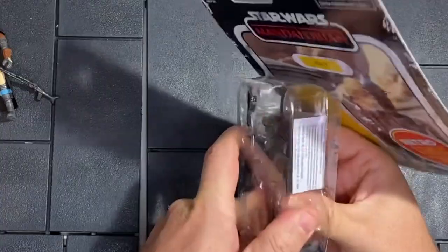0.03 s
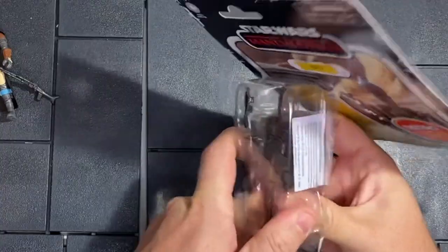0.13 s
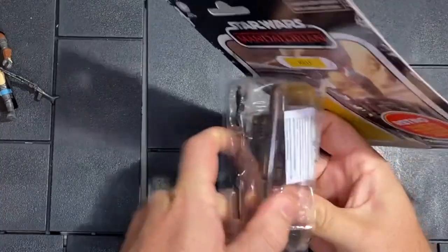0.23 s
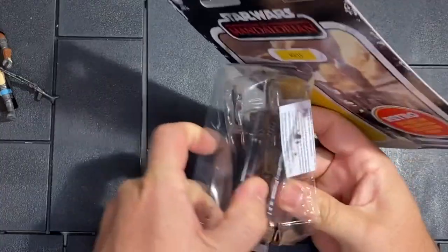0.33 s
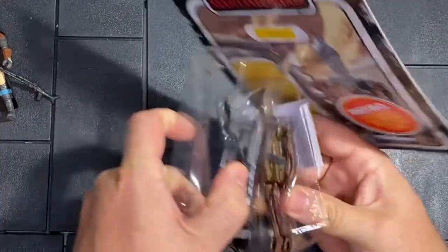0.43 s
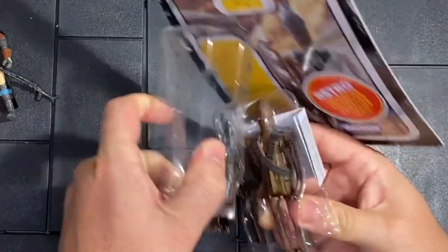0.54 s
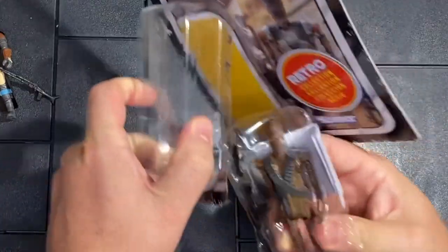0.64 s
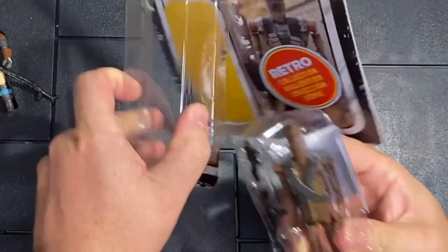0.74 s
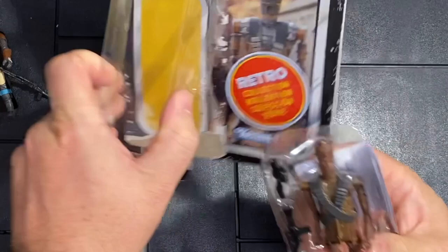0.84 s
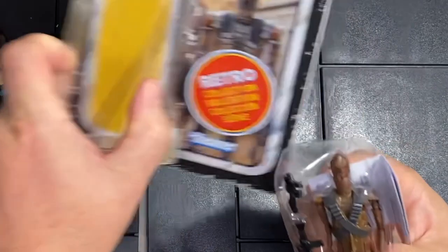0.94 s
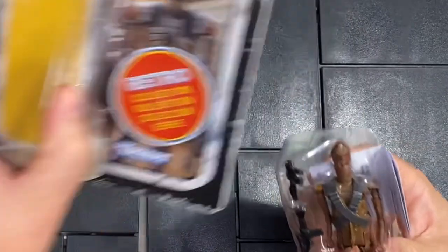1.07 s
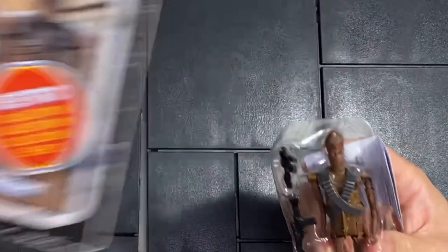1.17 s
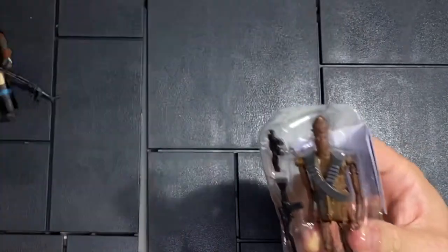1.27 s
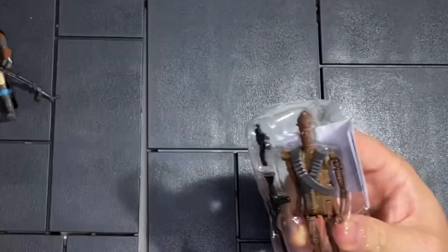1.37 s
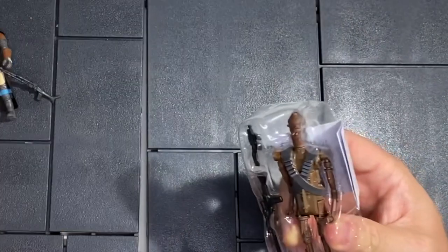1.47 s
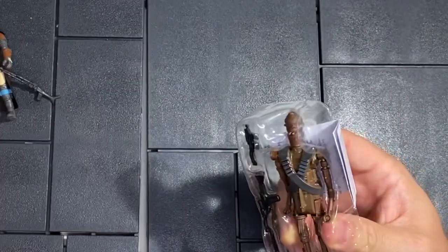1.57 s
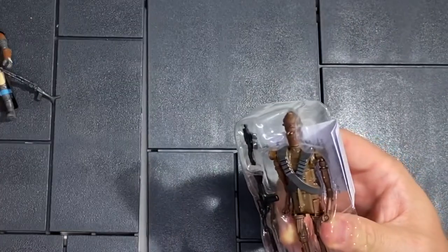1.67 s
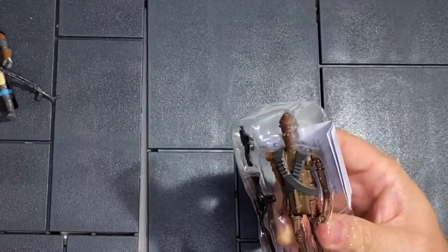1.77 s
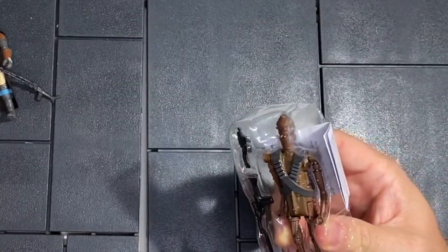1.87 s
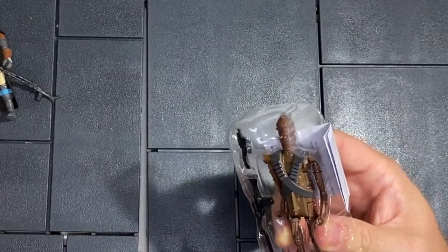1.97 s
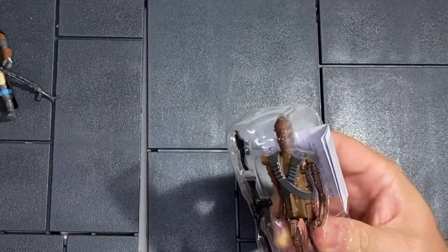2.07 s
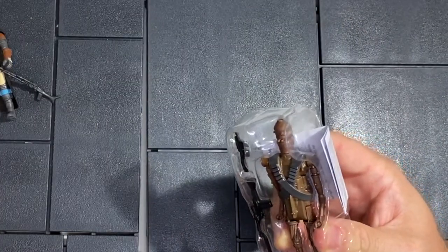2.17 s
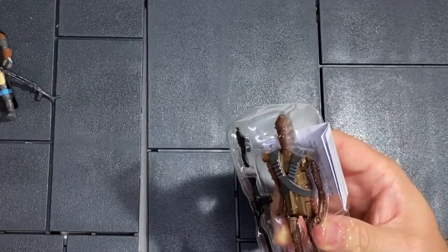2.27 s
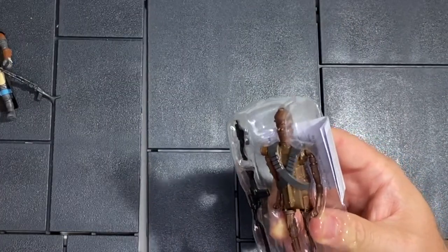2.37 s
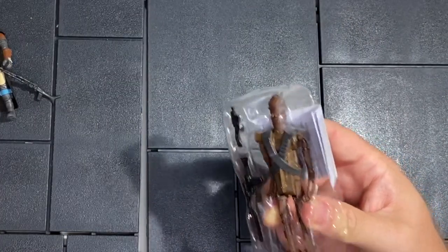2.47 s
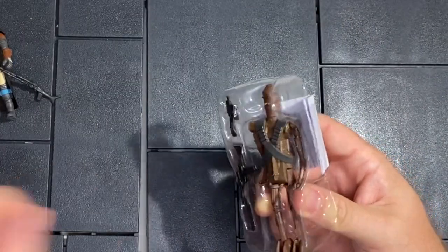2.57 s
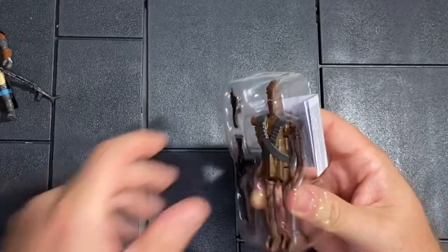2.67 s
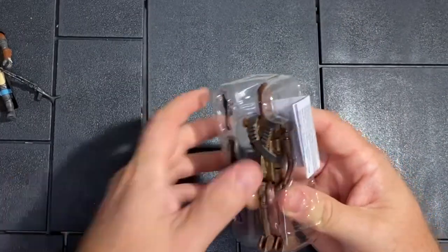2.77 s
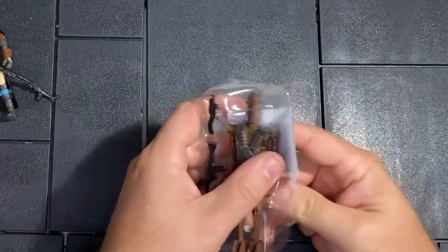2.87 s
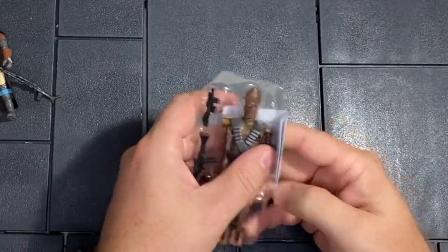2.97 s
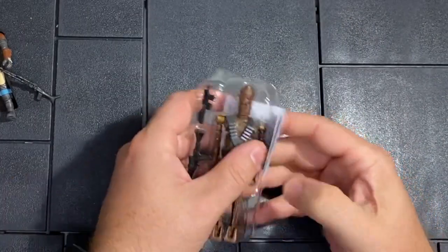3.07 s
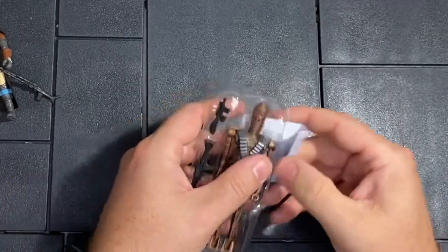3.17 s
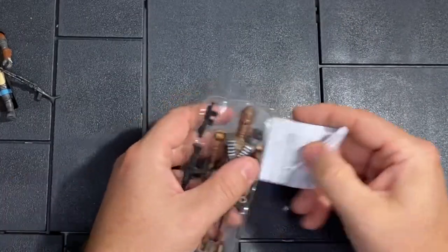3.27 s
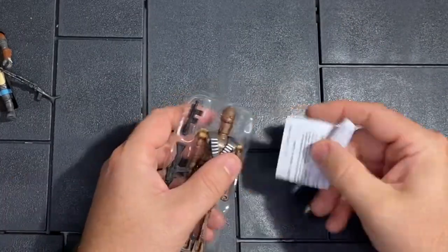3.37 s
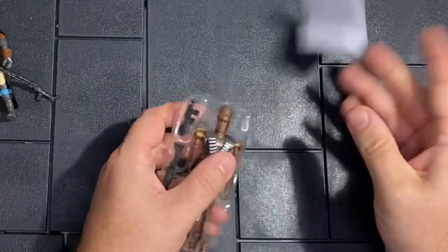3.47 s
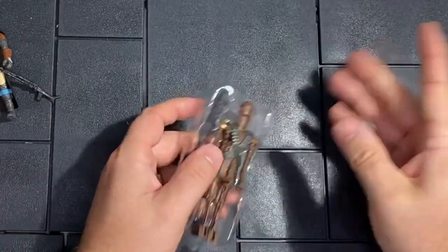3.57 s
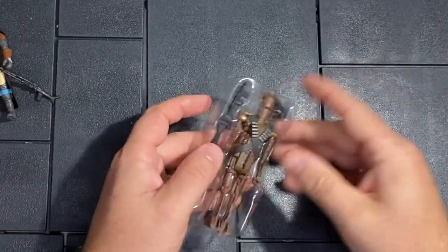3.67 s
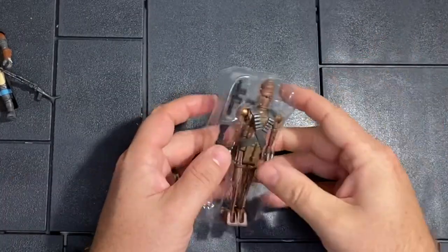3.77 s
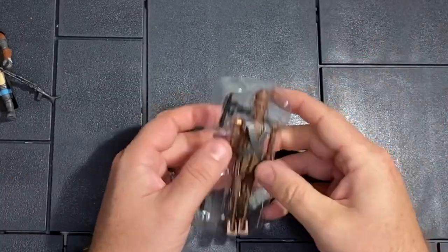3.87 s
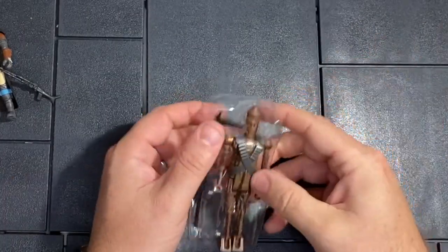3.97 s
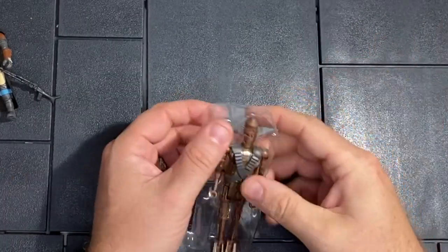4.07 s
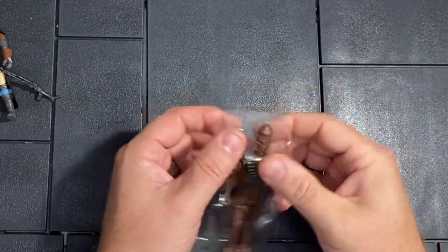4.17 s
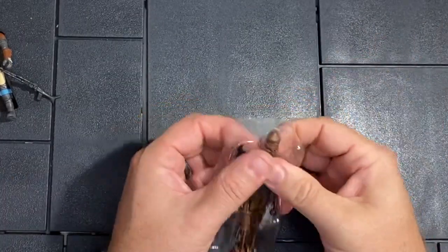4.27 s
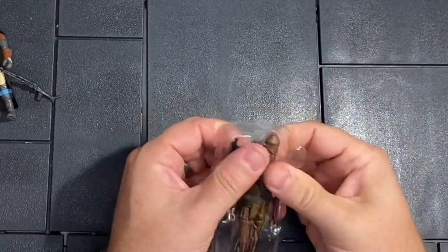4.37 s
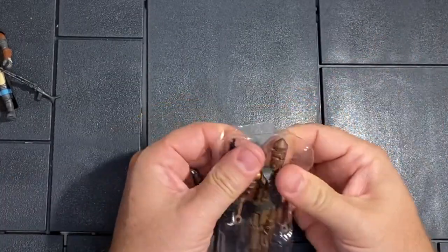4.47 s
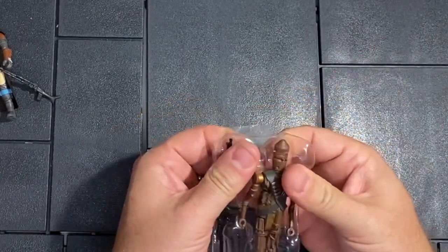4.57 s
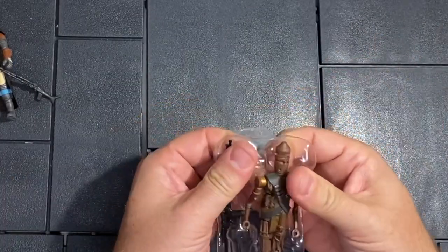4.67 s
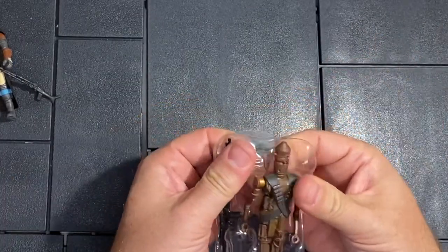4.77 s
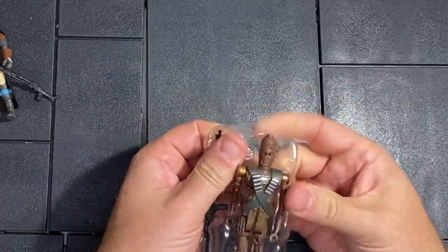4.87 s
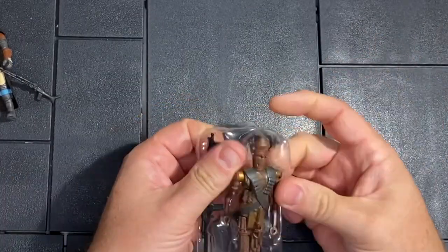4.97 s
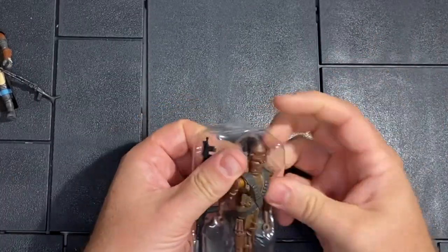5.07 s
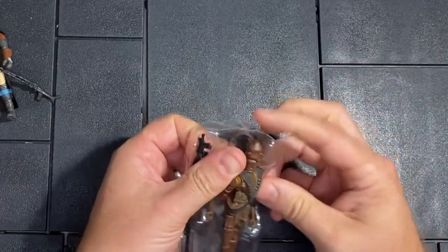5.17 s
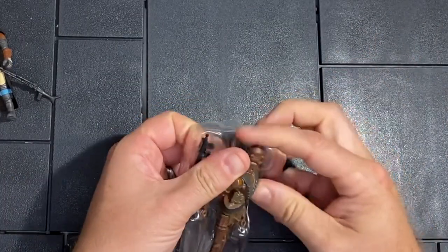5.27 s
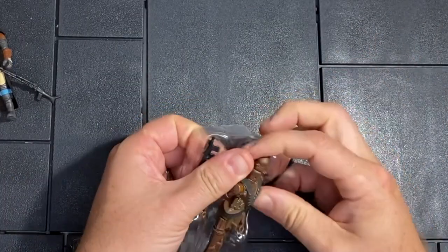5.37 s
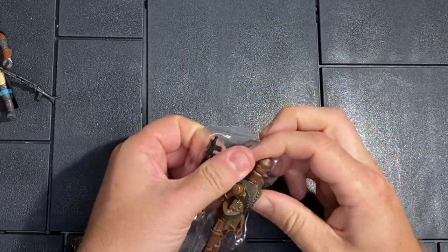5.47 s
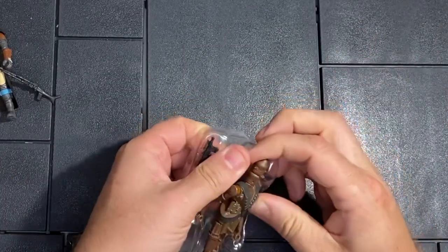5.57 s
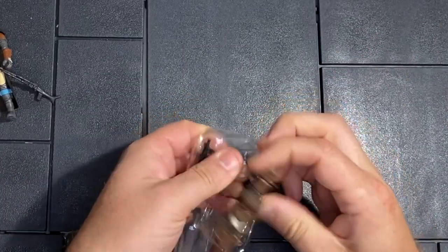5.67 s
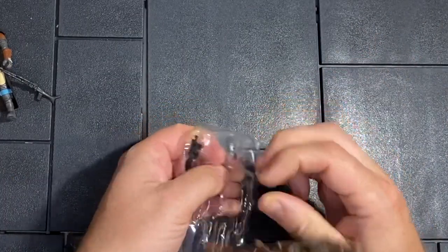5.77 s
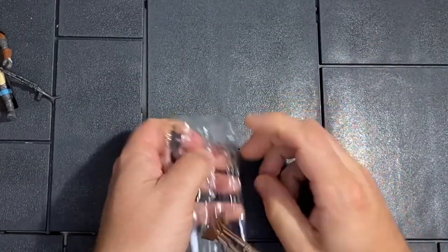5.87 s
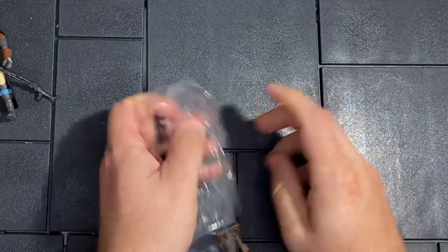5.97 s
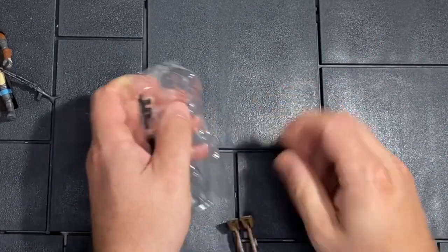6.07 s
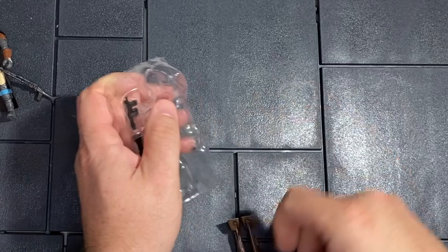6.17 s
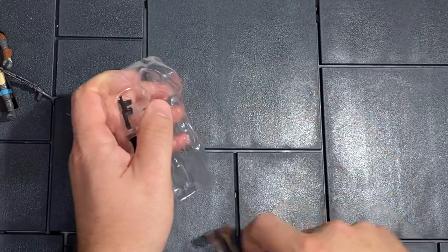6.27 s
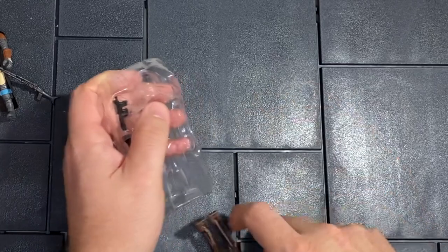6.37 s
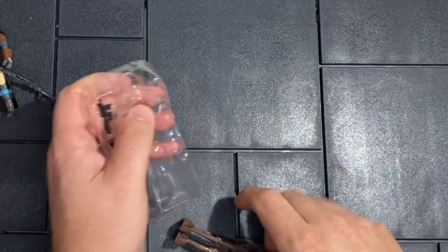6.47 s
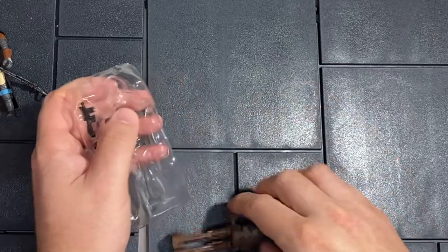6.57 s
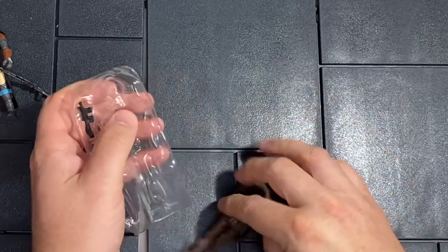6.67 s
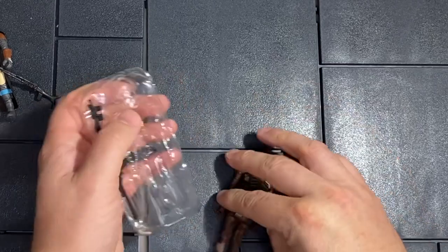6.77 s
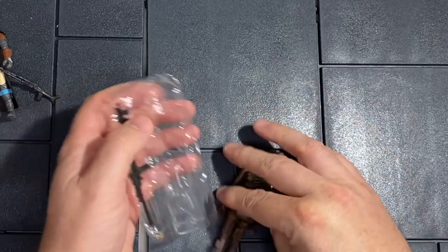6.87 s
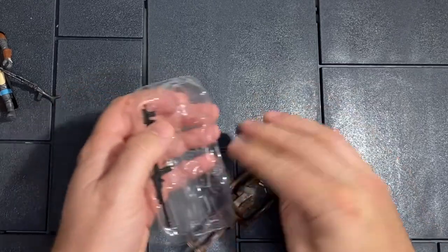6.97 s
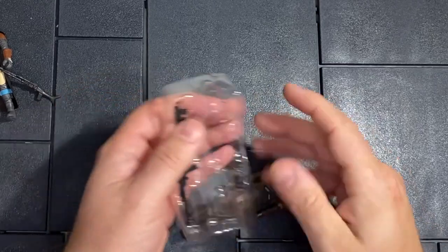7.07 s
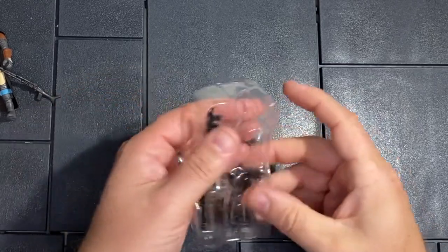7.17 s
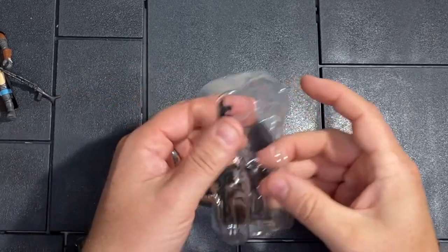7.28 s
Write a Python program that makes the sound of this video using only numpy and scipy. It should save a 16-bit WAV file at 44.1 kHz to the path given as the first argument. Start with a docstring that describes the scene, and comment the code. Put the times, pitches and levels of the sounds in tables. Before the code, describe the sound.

Close handling of a stiff plastic blister: sharp pops, creaky rubbing and crinkles, loudest just before a little plastic figure knocks down and scrapes briefly.

```python
"""Small, quiet room, heard close by: hands pull a clear plastic blister off its card, slide out a leaflet, free a figure.
Shell: panels flip as noise cracks plus sinking tones; stick-slip noise through resonances makes rubbing and creaks.
Card flaps: noise pushes dispersed by bending waves. Knocks: decaying table modes.
The figure drops on the table and is pushed along it as juddering noise; hands bump dully.
Random echoes and a noise tail form the room, over faint steady noise."""
import sys
import numpy as np
from scipy import signal
from scipy.fft import rfft, irfft
from scipy.io import wavfile
from scipy.ndimage import map_coordinates

SR = 44100
rng = np.random.default_rng(int(sys.argv[2]) if len(sys.argv) > 2 else 0)


def transcribe(u):
    """Save the signal u as a 16-bit wav file named by the first command-line argument.

    u: samples, shape (n,) or (channels, n), limited to [-1, 1]; the rate is SR.
    q: integer samples, one column per channel.
    """
    v = np.clip(np.atleast_2d(u).T, -1, 1)
    q = np.round(v * 32767).astype(np.int16)
    wavfile.write(sys.argv[1], SR, q)


N = 322635
T = np.arange(N) / SR


def undb(db):
    """Decibels to gain."""
    return 10 ** (np.asarray(db) / 20)


def unit(x):
    """Scale to rms 1."""
    return x / np.sqrt(np.mean(x ** 2))


def unit_energy(x):
    """Scale to mean energy 1 per channel."""
    return unit(x) / np.sqrt(x.shape[-1])


def fade(t, t60):
    """Exponential decay, -60 dB at t60."""
    return np.exp(-np.log(1000) * t / t60)


def curve(table, axis=1):
    """One table column interpolated at every sample."""
    rows = np.array(table)
    return np.interp(T, rows[:, 0], rows[:, axis])


def add(out, s, x):
    """Mix x in at time s."""
    i = max(int(s * SR), 0)
    out[:, i:i + x.shape[-1]] += x[..., :N - i]


def convolve(x, response):
    """Filter by an impulse response, keeping the length."""
    return signal.fftconvolve(np.atleast_2d(x), np.atleast_2d(response), axes=-1)[:, :x.shape[-1]]


def colour(x, points, size=4096):
    """Minimum-phase filter through (f/Hz, level/dB) points."""
    hz, db = np.transpose(points)
    grid_hz = np.maximum(np.arange(size // 2 + 1) * SR / size, 1)
    gain_db = np.interp(np.log(grid_hz), np.log(hz), db)
    cepstrum = irfft(np.log(undb(gain_db)))
    # fold to the causal half
    cepstrum[1:size // 2] *= 2
    cepstrum[size // 2 + 1:] = 0
    return convolve(x, irfft(np.exp(rfft(cepstrum))))


def highpass(x, hz, order=2):
    """Butterworth cut below hz."""
    return signal.sosfilt(signal.butter(order, hz, "high", fs=SR, output="sos"), x)


def resonate(x, hz, width_hz):
    """One resonance with a moving centre: shift to 0 Hz, smooth, shift back."""
    turn = np.exp(2j * np.pi * np.cumsum(hz) / SR)
    pole = np.exp(-np.pi * width_hz / SR)
    return np.real(turn * signal.lfilter([1 - pole], [1, -pole], x / turn))


def noise(size, apart):
    """Two-port noise; apart is the power share not in common."""
    share = np.clip(apart, 0, 1)
    z = rng.standard_normal((3, size))
    return np.sqrt(1 - share) * z[0] + np.sqrt(share) * z[1:]


def wander(per_second):
    """Slow random curve, knots of spread 1."""
    knots = rng.standard_normal(512)
    return np.interp(T * per_second, np.arange(len(knots)), knots)


def strokes(table, crest, catch_db, ebb_db, axis=2):
    """Gain of gestures: each catches quickly, moves to its crest level at a share of its length, ebbs, lets go."""
    gain = np.zeros(N)
    for row in table:
        start, length = row[:2]
        crest_s = .002 + np.clip(crest, .05, .95) * length
        corners = start + np.array([-.012, .002, crest_s, .002 + length, .052 + length])
        span = slice(max(int(corners[0] * SR), 0), int(corners[-1] * SR))
        shape_db = np.interp(T[span], corners, [-30, catch_db, 0, ebb_db, -40])
        gain[span] = np.maximum(gain[span], undb(row[axis] + shape_db))
    return gain


def slips(per_second, spread_db, grain_t60, smooth_db):
    """Stick-slip: tiny noise bursts of very uneven size over a smooth hiss."""
    hits = rng.random(N) < per_second / SR
    sizes = undb(spread_db * np.minimum(rng.exponential(size=N), 4))
    power = convolve(hits * sizes ** 2, fade(T[:SR // 10], grain_t60) ** 2)
    envelope = np.sqrt(np.abs(power / power.mean()) + undb(smooth_db) ** 2)
    return noise(N, apart=0.51) * envelope


# resonances of the moulded shell: f/Hz, width/Hz, relative level/dB
SHELL_MODES = [(1710, 80, -5.5), (2290, 51, -11), (2910, 100, 0.5), (4900, 560, -6.5), (7080, 760, 0)]


def shell(x, ring_db):
    """The shell adds its fixed resonances to whatever shakes it."""
    rings = 0
    for hz, width_hz, db in SHELL_MODES:
        rings = rings + undb(db) * signal.lfilter(*signal.iirpeak(hz, hz / width_hz, fs=SR), x)
    return x + undb(ring_db) * rings


def gripped(x, ring_db, grip_db):
    """Shifting fingers broaden the shell resonances and vary the level of each at random."""
    rings = 0
    for hz, width_hz, db in SHELL_MODES:
        ring = signal.lfilter(*signal.iirpeak(hz, hz / (width_hz + 150), fs=SR), x)
        rings = rings + ring * undb(db + grip_db * wander(15))
    return x + undb(ring_db) * rings


CREEP_S = .004
SNAP_ENERGY_DB = 15
PANEL_SAG, PANEL_SAG_S = .12, .004  # initial sharpness as a share; time constant of its relaxation
# crack spectrum before tilt and shell: f/Hz, level/dB
CRACK_SPECTRUM = [(60, -47), (400, -0.5), (900, 4.5), (2000, 3), (3200, -3.5), (7000, -10), (9000, -14.5),
                  (11500, -9), (13600, -23.5), (15500, -19)]


def snap(pitch_hz, treble_db, size=4096):
    """A crease creeps, then the panel flips: a crack, sinking tones, a shiver through the sheet."""
    t = np.arange(size) / SR - CREEP_S
    after = np.maximum(t, 0)
    creep = undb(-10.0) * (t < 0) * fade(np.abs(t), 0.002)
    crack = noise(size, apart=0.17) * (creep + fade(after, .012) - fade(after, .0025))
    shiver = undb(-13.5) * noise(size, apart=.4) * fade(after, .065) * (t > 0)
    crack = highpass(crack + shiver, pitch_hz / 8)
    # a small, high-pitched panel moves little air below its own pitch
    tilt = [(pitch_hz / 4, -5), (pitch_hz * .6, 0), (4500, 0), (7000, 1.1 * (treble_db + 20.0))]
    coloured = colour(colour(crack, CRACK_SPECTRUM), sorted(tilt))
    crack = unit_energy(shell(coloured, ring_db=-2.5))
    sag_s = PANEL_SAG * PANEL_SAG_S * (1 - np.exp(-after / PANEL_SAG_S))
    cycles = pitch_hz * (after + sag_s) / (1 + PANEL_SAG / 2)
    # a curved panel has a second, weaker mode above the first
    modes = np.sin(2 * np.pi * cycles) + .5 * np.sin(2 * np.pi * cycles * rng.uniform(1.1, 1.55))
    panel = highpass(modes * (fade(cycles, 36) - fade(cycles, 3.5)), pitch_hz / 2)
    return undb(SNAP_ENERGY_DB) * unit_energy(crack + unit_energy(panel))


# shell buckles and, after the drop, figure clacks:
# t/s, level/dB before SNAP_ENERGY_DB, panel f/Hz, treble setting (-20 is neutral, higher is brighter)
SNAP_EVENTS = [(0.097, -24.5, 1500, -18), (0.184, -16, 985, -16.5), (0.213, -18.5, 798, -28),
               (0.248, -6.5, 1070, -11), (0.28, -5, 1673, -19.5), (0.456, -15.5, 1463, -19),
               (0.621, -26.5, 2940, -19), (0.669, -25.5, 719, -16.5), (0.723, -25.5, 1360, -50),
               (0.808, -34.5, 1400, -15), (0.968, -34.5, 6900, -9), (1.009, -28.5, 3040, -19),
               (1.77, -18, 1186, -27), (1.807, -12, 1044, -28), (2.546, -40, 1624, -36),
               (2.687, -48, 1820, -32), (2.987, -10.5, 1024, -19.5), (3.008, -19, 1020, -17),
               (3.028, -18.5, 2200, -34), (3.221, -25, 1520, -32), (3.576, -28.5, 1560, -9),
               (3.854, -26, 1030, -18), (3.934, -25, 1078, -21.5), (4.101, -28.5, 996, -22),
               (4.211, -33, 1110, -28), (4.239, -28.5, 1041, -31), (4.319, -10.5, 2500, -14),
               (4.33, -13.5, 2300, -40), (4.42, -22.5, 1000, -15), (4.471, -11.5, 2230, -13.5),
               (4.517, -1, 1774, -18), (4.5272, -1, 1865, -30), (4.553, -0.5, 6940, -6),
               (4.598, -10, 1835, -15), (4.737, -13.5, 1710, -19.5), (4.853, -13, 4740, -20),
               (4.871, -15, 3000, -14), (4.894, -18.5, 1900, -18), (4.919, -15, 1654, -15.5),
               (5.008, -16.5, 730, -15), (5.026, -17, 7050, -14), (5.034, -15.5, 2100, -9),
               (5.073, -3, 1674, -20.5), (5.114, -16, 2370, -26), (5.133, -17.5, 1155, -29),
               (5.225, -16.5, 1436, -30), (5.269, -35, 14700, -3), (5.344, -13, 915, -26),
               (5.368, -16, 960, -39), (5.541, -13.5, 1042, -34.5), (5.624, -20, 1050, -23),
               (5.68, 4, 985, -22), (5.715, 5, 1117, -22), (5.759, -12, 1070, -33),
               (5.889, -13, 935, -12.5), (5.932, -19.5, 1000, -21), (5.952, -13.5, 1060, -29),
               (5.972, 1.5, 669, -26.5), (5.994, -3.5, 2140, -25), (6.081, -21.5, 1386, -28),
               (6.303, -26, 1820, -23), (6.526, -22, 1600, -32), (6.731, -26.5, 1306, -50)]


def snaps():
    """Panels flip at the listed times; the creep leads each flip."""
    out = np.zeros((2, N))
    for s, db, pitch_hz, treble_db in SNAP_EVENTS:
        add(out, s - CREEP_S, undb(db) * snap(pitch_hz, treble_db))
    return out


DROP_S = 5.92  # figure leaves the shell


def gripped_snaps():
    """Snaps before the drop, while the fingers still strain the shell."""
    return [row for row in SNAP_EVENTS if row[0] < DROP_S]


FOLLOW_MIN_S, FOLLOW_MAX_S, FOLLOW_DB, FOLLOW_OCTAVES = .007, 0.04, -15.5, .4


def followers():
    """Each gripped flip unloads the next panel, which flips soon after, weaker and at a nearby pitch."""
    out, rows = np.zeros((2, N)), gripped_snaps()
    chance = rng.random((len(rows), 2))
    for (s, db, pitch_hz, treble_db), (late, high) in zip(rows, chance):
        sound = snap(pitch_hz * 2 ** (FOLLOW_OCTAVES * (2 * high - 1)), treble_db)
        delay_s = FOLLOW_MIN_S + late * (FOLLOW_MAX_S - FOLLOW_MIN_S)
        add(out, s + delay_s, undb(db + FOLLOW_DB) * sound)
    return out


CREASES_PER_S, CREASE_DB, CREASE_SPREAD_DB = 10, 7.5, 3  # level over the friction gain
CREASE_HZ, CREASE_OCTAVES, CREASE_TREBLE_DB, CREASE_TREBLE_SPREAD_DB = 1652, 0.48, -20.5, 11.5


def small_snaps(friction):
    """Lesser creases flip at random, following the hands' friction, with random pitch and brightness."""
    out, count = np.zeros((2, N)), int(CREASES_PER_S * T[-1])
    times = rng.random(256)[:count] * T[-1]
    chance = np.clip(rng.standard_normal((256, 3)), -2, 2)
    for s, (strong, high, bright) in zip(times, chance):
        pitch_hz = CREASE_HZ * 2 ** (CREASE_OCTAVES * high)
        sound = snap(pitch_hz, CREASE_TREBLE_DB + CREASE_TREBLE_SPREAD_DB * bright)
        gain = friction[int(s * SR)] * undb(CREASE_DB + CREASE_SPREAD_DB * strong)
        add(out, s, gain * sound)
    return out


def pull(table):
    """Gain of a sustained pull; dies quickly outside its span."""
    outside_s = np.abs(T - np.clip(T, table[0][0], table[-1][0]))
    return undb(curve(table)) * fade(outside_s, 0.051)


HOLD_DB, HOLD_HISS_DB = -78, -91.5  # shell merely held
LEAFLET_HISS_DB, PRISE_HISS_DB = -5, -18.5  # relative to the pull
# fingers shift and slide on plastic: start t/s, length/s, creak drive level/dB, hiss drive level/dB
FINGER_SLIDES = [(0, 0.15, -40.5, -55), (.1, 0.37, -32, -51.5), (.36, 0.15, -33, -41.5),
                 (.68, 0.58, -51.5, -61), (1.125, 0.061, -46, -60), (1.29, 0.075, -49, -66.5),
                 (1.605, 0.23, -53, -64), (1.82, 0.28, -46, -91), (2.205, .03, -55.5, -73.5),
                 (2.58, 0.55, -70, -90), (2.765, 0.16, -51.5, -61), (2.875, 0.19, -38, -46),
                 (3.42, 0.11, -45, -52.5), (3.547, 0.18, -39, -48), (3.768, 0.61, -44, -57.5),
                 (4.21, 0.17, -41.5, -52), (5.615, 0.24, -27.5, -57), (6.283, 0.15, -38.5, -59),
                 (6.455, 0.34, -40.5, -57), (6.86, 0.29, -59.5, -81.5), (6.96, 0.38, -52, -72),
                 (7.18, 0.11, -39, -54)]
# leaflet slides out: t/s, friction drive level/dB
LEAFLET_PULL = [(3.04, -37), (3.088, -52.5), (3.238, -43.5), (3.27, -34.5), (3.325, -30.5), (3.41, -57.5)]
# figure is prised loose: t/s, friction drive level/dB
PRISE_PULL = [(4.36, -49), (4.472, -28), (4.686, -40.5), (4.854, -32), (4.96, -37), (5.032, -35),
              (5.112, -30.5), (5.374, -47), (5.52, -47.5)]


def effort():
    """Hand friction as creak and hiss gains: powers of holding, slides and two pulls add."""
    slides = np.array([strokes(FINGER_SLIDES, crest=0.24, catch_db=-1, ebb_db=-14.0, axis=k) for k in (2, 3)])
    power = slides ** 2 + undb([[HOLD_DB], [HOLD_HISS_DB]]) ** 2
    for table, hiss_db in (LEAFLET_PULL, LEAFLET_HISS_DB), (PRISE_PULL, PRISE_HISS_DB):
        power = power + (pull(table) * undb([[0], [hiss_db]])) ** 2
    return np.sqrt(power)


STRONG_DB, FORERUN_S, FORERUN_DB = -13.2, 0.016, -5.5  # slip ahead of snaps above STRONG_DB
SETTLE_DB, SETTLE_T60_S, SETTLE_HISS_DB, SETTLE_TREBLE_SHARE = -21.5, 0.18, -8, 0.23


def settling():
    """Friction gains around gripped snaps: a slip before strong ones, a dying slip after all; bright ones hiss more."""
    power, t = np.zeros((2, N)), T[:SR // 2] - FORERUN_S
    for s, db, _, treble_db in gripped_snaps():
        shape = np.where(t < 0, undb(FORERUN_DB) * (db > STRONG_DB), fade(t, SETTLE_T60_S))
        creak_db = db + SETTLE_DB
        hiss_db = creak_db + SETTLE_HISS_DB + SETTLE_TREBLE_SHARE * treble_db
        add(power, s - FORERUN_S, np.outer(undb([creak_db, hiss_db]), shape) ** 2)
    return np.sqrt(power)


def crinkles(per_second, pitch_hz, octaves, cycles, spread_db, size=512):
    """Many tiny creases flip as short decaying sines of random pitch, level and side."""
    out, t = np.zeros((2, N)), T[:size]
    chance = rng.random((int(per_second * T[-1]), 4))
    for when, high, strong, side in chance:
        hz = min(pitch_hz * 2 ** (octaves * np.log(high / (1 - high))), SR / 4)
        gain = undb(spread_db * min(-np.log(strong), 3))
        grain = np.sin(2 * np.pi * hz * t) * fade(t, cycles / hz) * gain
        add(out, when * T[-1], np.outer([.5 + side, 1.5 - side], grain))
    return unit(out)


CATCH_DB, CATCHES_PER_S = 2.5, 45  # sliding fingers catch and let go
# power share of crinkling in the friction: t/s, share/0-1
SQUEEZE_SHARE = [(0, 0.7), (1.4, 0.1), (3.4, 0.15), (4.4, 0.41), (5.9, 0.6), (6.4, 0.4)]
# friction that shakes the shell: f/Hz, level/dB
RUB_SPECTRUM = [(100, -31), (400, -8.5), (700, -5), (1050, 5.5), (1600, -4), (3500, -5.5), (5000, -11),
                (9000, -27)]
# hiss at the contact: f/Hz, level/dB
HISS_SPECTRUM = [(2000, -4.5), (4000, 2.5), (7300, 1.5), (8700, -8), (11500, -0.5), (13500, -32),
                 (15500, -12.5)]


def rubbing(creak_gain, hiss_gain):
    """Friction shakes the shell and hisses at the contact; pressure adds crinkles and fine ticks."""
    friction = slips(per_second=300, spread_db=9.0, grain_t60=0.0018, smooth_db=6.0)
    squeeze = np.clip(curve(SQUEEZE_SHARE), 0, 1)
    slide, buckle = np.sqrt(1 - squeeze), np.sqrt(squeeze)
    creases = crinkles(per_second=170, pitch_hz=1833, octaves=.4, cycles=21, spread_db=-1.0)
    shaking = slide * unit(colour(friction, RUB_SPECTRUM)) + buckle * highpass(creases, 360)
    ringing = gripped(shaking, ring_db=-5.0, grip_db=10.0)
    creak = unit(ringing * undb(CATCH_DB * wander(CATCHES_PER_S)))
    ticks = crinkles(per_second=17, pitch_hz=8300, octaves=0.12, cycles=3.6, spread_db=0.5)
    hiss = slide * unit(colour(friction, HISS_SPECTRUM)) + buckle * highpass(ticks, 4000)
    return creak * creak_gain * undb(-3.5) + hiss * hiss_gain * undb(-1.5)


CREAK_WIDTH_HZ, CREAK_STEP_HZ, CREAK_UPPER_DB = 340, 1150, -3.5  # step: upper resonance above the lower
# finger or leaflet drags over a bending panel: start t/s, length/s, level/dB, first f/Hz, last f/Hz
CREAK_EVENTS = [(2.604, 0.45, -62, 1700, 1760), (3.032, 0.035, -38.5, 2240, 2330),
                (3.038, 0.27, -44.5, 990, 1200), (3.253, 0.05, -32.5, 2240, 2800),
                (3.248, 0.052, -33.5, 980, 1250), (3.764, 0.082, -48, 1320, 1240),
                (3.94, 0.08, -49, 2560, 2310), (4.059, 0.083, -45, 1260, 1050),
                (4.747, 0.19, -41.5, 1800, 1920), (7.046, 0.083, -55, 2570, 1940)]


def creaks():
    """Stick-slip drives two resonances of a bending panel; they glide together."""
    friction = slips(per_second=300, spread_db=3.5, grain_t60=.004, smooth_db=-6)
    out = np.zeros((2, N))
    for row in CREAK_EVENTS:
        s, length, _, first_hz, last_hz = row
        gain = strokes([row], crest=.5, catch_db=-1.5, ebb_db=-4.5)
        span = gain > 0
        glide_hz = np.interp(T[span], [s, s + length], [first_hz, last_hz])
        tones = []
        for hz in (glide_hz, glide_hz + CREAK_STEP_HZ):
            once = resonate(friction[:, span], hz, CREAK_WIDTH_HZ)
            tones.append(unit(resonate(once, hz, CREAK_WIDTH_HZ)))
        low, high = tones
        out[:, span] += unit(low + undb(CREAK_UPPER_DB) * high) * gain[span]
    return out


FLAP_ENERGY_DB = 21.0
# card, paper and loosened shell flap and land: t/s, level/dB before FLAP_ENERGY_DB, f/Hz before limits
FLAP_EVENTS = [(0.044, -32, 431), (0.135, -33, 590), (0.208, -17, 710), (0.298, -19, 610),
               (0.456, -26.5, 627), (1.774, -29.5, 463), (1.82, -29.5, 237.2), (2.987, -27, 191.4),
               (3.621, -33, 154), (4.599, -33, 203)]


def flaps(size=8192):
    """Bending waves in the card: higher ones travel faster, so each flap falls in pitch."""
    out, t = np.zeros((2, N)), np.arange(size) / SR
    hz = np.arange(size // 2 + 1) * SR / size
    for s, db, pitch_hz in FLAP_EVENTS:
        push = noise(size, apart=0.034) * (fade(t, 0.031) + undb(-22.5) * fade(t, 0.14))
        centre_hz = np.clip(pitch_hz, 130, 900)
        push = colour(push, [(30, -26), (100, -8), (centre_hz, 0), (2.0 * centre_hz, -9), (3000, -30)])
        # group delay goes as 1 / sqrt(f): 0.006 s at 400 Hz
        bent = irfft(rfft(push) * np.exp(-4j * np.pi * 0.006 * np.sqrt(400 * hz)))
        add(out, s, undb(db + FLAP_ENERGY_DB) * unit_energy(bent))
    return out


# figure and hand knock on the table: t/s, peak level/dB, favoured f/Hz
KNOCK_EVENTS = [(4.15, -55.5, 135), (5.972, -0.5, 620), (5.981, -15.5, 405), (6.308, -26, 328),
                (6.702, -23, 630), (6.778, -32.5, 134.3), (6.985, -31.5, 138)]
# modes of the table with the figure on it: f/Hz, level/dB, t60/s
TABLE_MODES = [(64, -11, .45), (141, -7, .2), (208, -6, .15), (444, -8, .06), (620, 5, .04),
               (840, -12, .04)]


def knocks():
    """Blows ring the table, low modes building up last; a soft contact favours those, a hard one the high."""
    out, t = np.zeros((2, N)), T[:SR // 2]
    for s, db, pitch_hz in KNOCK_EVENTS:
        ring = 0
        for hz, mode_db, t60 in TABLE_MODES:
            swing = np.sin(2 * np.pi * hz * t) * fade(t, t60) * (1 - fade(t * hz, 2.6))
            ring = ring + undb(mode_db - 10 * abs(np.log2(hz / pitch_hz))) * swing
        add(out, s, undb(db) * ring / np.abs(ring).max())
    return out


LURCH_DB, LURCHES_PER_S = 2.5, 39
SCRAPE_HZ, SCRAPE_WIDTH_HZ, SCRAPE_DB = 641, 12, -5.5  # table ring
# figure is pushed along the table: start t/s, length/s, level/dB
DRAG_STROKES = [(6.285, 0.11, -33), (6.455, 0.291, -33.5)]
# judder spectrum: f/Hz, level/dB
DRAG_SPECTRUM = [(30, -34), (65, 11.5), (100, -3), (200, 2.5), (480, 3.5), (1200, -0.5), (3000, -22),
                 (8000, -45.5)]


def dragging():
    """The figure judders over the table in uneven lurches and sets it ringing."""
    judder = slips(per_second=220, spread_db=4, grain_t60=0.0065, smooth_db=-1).mean(axis=0)
    judder = judder * undb(LURCH_DB * wander(LURCHES_PER_S))
    body = unit(colour(judder, DRAG_SPECTRUM))
    ring = unit(resonate(body, np.full(N, SCRAPE_HZ), SCRAPE_WIDTH_HZ))
    gain = strokes(DRAG_STROKES, crest=0.22, catch_db=-4.0, ebb_db=-3.0)
    return unit(body + undb(SCRAPE_DB) * ring) * gain


# handling of card, shell and table: start t/s, length/s, level/dB
HANDLING_STROKES = [(.13, 0.38, -40), (.66, 0.7, -57.5), (1.78, 0.36, -45.5), (3.62, 0.11, -47),
                    (5.98, 0.17, -31.5), (6.69, 0.17, -38.5), (6.925, 0.31, -49.5)]
# bump spectrum: f/Hz, level/dB
HANDLING_SPECTRUM = [(25, -17), (60, 2.5), (95, -1.5), (170, 0), (500, -6.5), (900, -9.5), (2500, -53)]


def handling():
    """Dull bumping of hands and card: low-coloured noise in strokes."""
    bumps = unit(colour(noise(N, apart=0.03), HANDLING_SPECTRUM))
    return bumps * strokes(HANDLING_STROKES, crest=0.25, catch_db=1.5, ebb_db=-14.0)


def room(x, early_db, tail_db, low_t60, high_t60):
    """Table and near walls return early echoes; a noise tail follows, split at 1500 Hz into two decays."""
    t = T[:SR * 3 // 5]
    echoes = noise(len(t), apart=0.037) * (rng.random(len(t)) < .02) * fade(t, 0.042) * (t > .003)
    air = noise(len(t), apart=1.0) * np.minimum(t / 0.011, 1)
    low = signal.sosfilt(signal.butter(2, 1500, fs=SR, output="sos"), air)
    tail = low * fade(t, low_t60) + (air - low) * fade(t, high_t60)
    return convolve(x, undb(early_db) * unit_energy(echoes) + undb(tail_db) * unit_energy(tail))


QUIET_DB = -62.5
# background noise spectrum: f/Hz, level/dB
QUIET_SPECTRUM = [(15, -35), (25, -2.5), (59, -11), (207, -18.5), (1390, -37.5), (15000, -65.5)]


def quiet_background():
    """Steady, mostly low noise of the quiet room."""
    return unit(colour(noise(N, apart=.15), QUIET_SPECTRUM)) * undb(QUIET_DB)


LEFT_DB, LEFT_LEAD_S = 4, 0.000286  # port level difference and lead added at place 1
# place of the busy hand; far left is where the card is put down: t/s, place/0 front-1 far left
HAND_PLACE = [(.6, 0), (1.7, .2), (1.76, 1), (2.15, 1), (2.55, 0)]


def scene():
    """All sources; sound reaches the left port before the right, the more so the further left it is made."""
    hands, place = effort(), curve(HAND_PLACE)
    near = snaps() + followers() + small_snaps(hands[0])
    near = near + rubbing(*np.hypot(hands, settling())) + creaks()
    near = near + flaps() + knocks() + handling() + dragging()
    delayed = np.arange(N) - 1.5 - place * LEFT_LEAD_S * SR
    right = map_coordinates(near[1], [delayed], order=3)
    left_gain, right_gain = undb(1.12 + place * LEFT_DB / 2), undb(2.5 - place * LEFT_DB / 2)
    direct = np.array([near[0] * left_gain, right * right_gain])
    answer = room(near, early_db=-6.0, tail_db=-8, low_t60=0.25, high_t60=.28)
    return direct + answer + quiet_background()


TOP_HZ = 16200


def record(dry):
    """Round off the loudest peaks at full scale; cut deep bass and everything above TOP_HZ."""
    rounded = highpass(dry / (1 + dry ** 4) ** (1 / 4), 42, order=4)
    return signal.sosfilt(signal.ellip(8, .2, 70, TOP_HZ, fs=SR, output="sos"), rounded)


dry = scene()
out = record(dry)
transcribe(out)
```